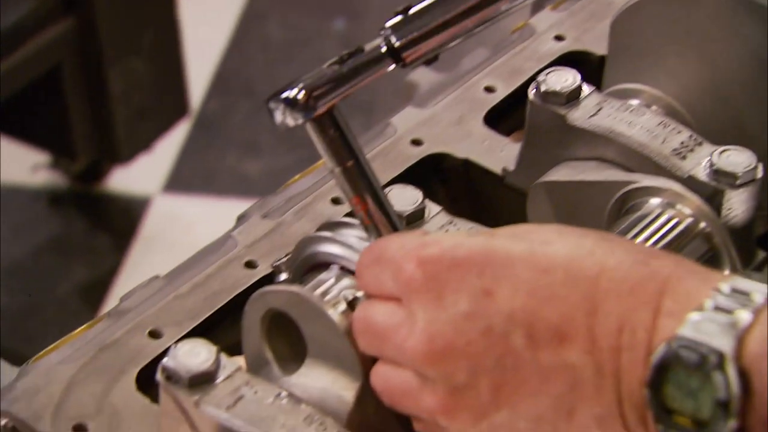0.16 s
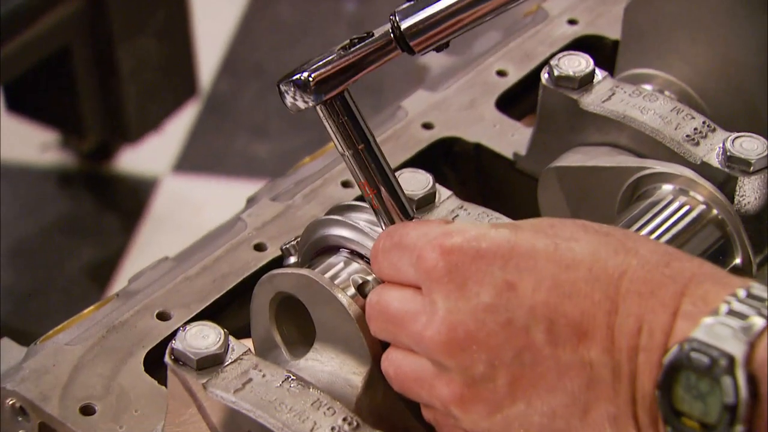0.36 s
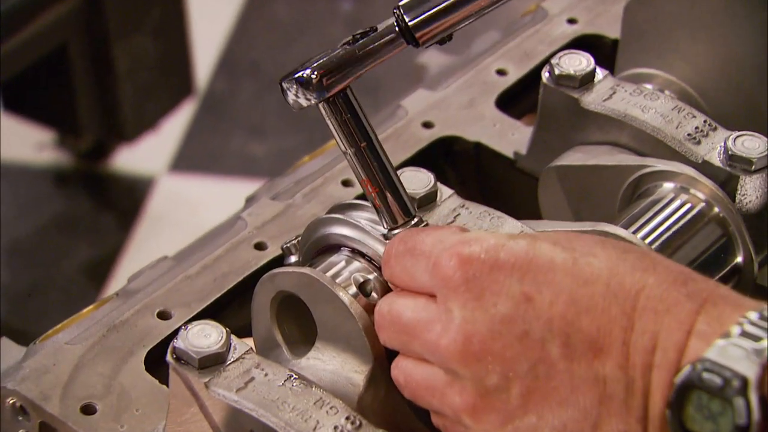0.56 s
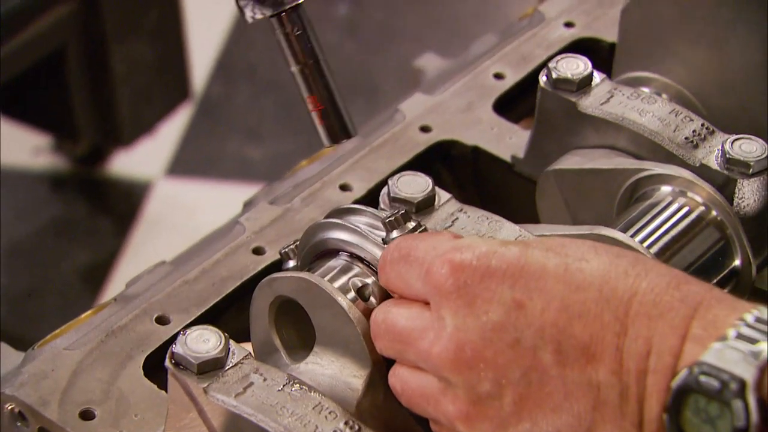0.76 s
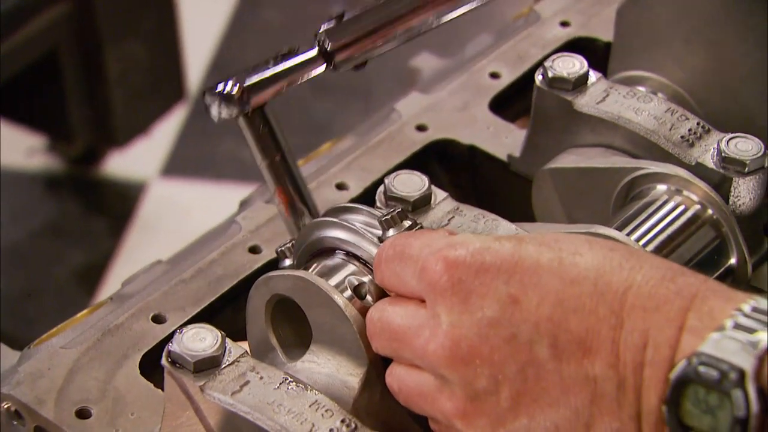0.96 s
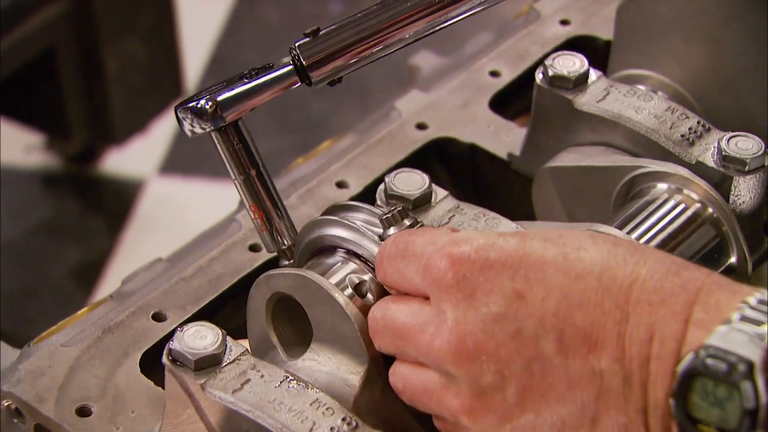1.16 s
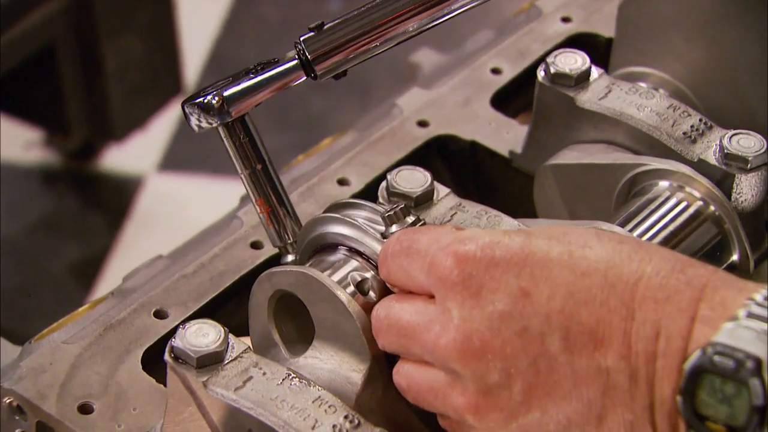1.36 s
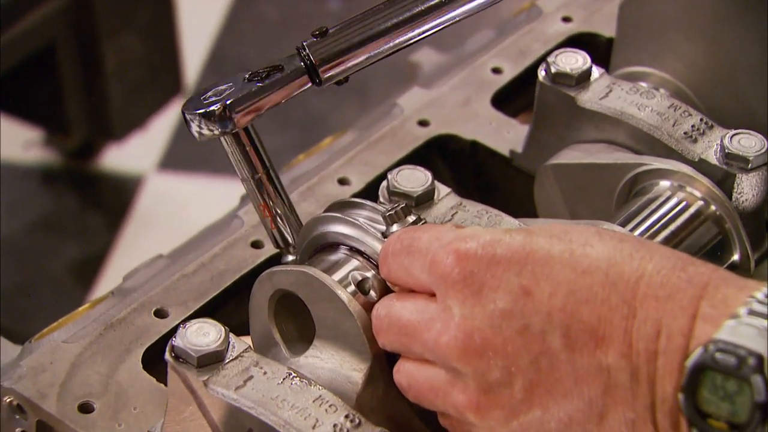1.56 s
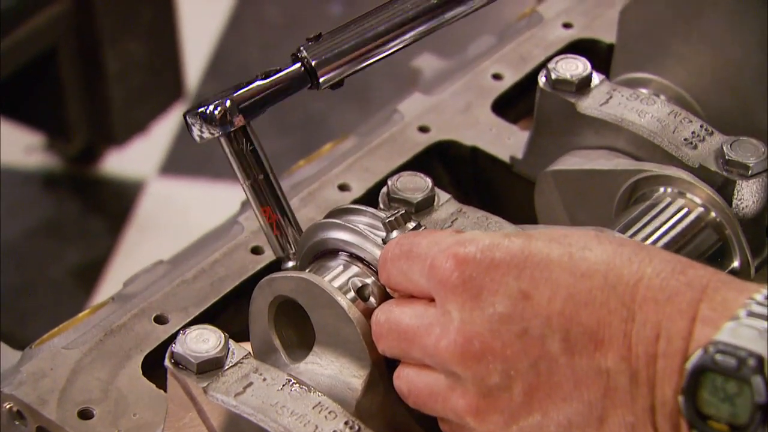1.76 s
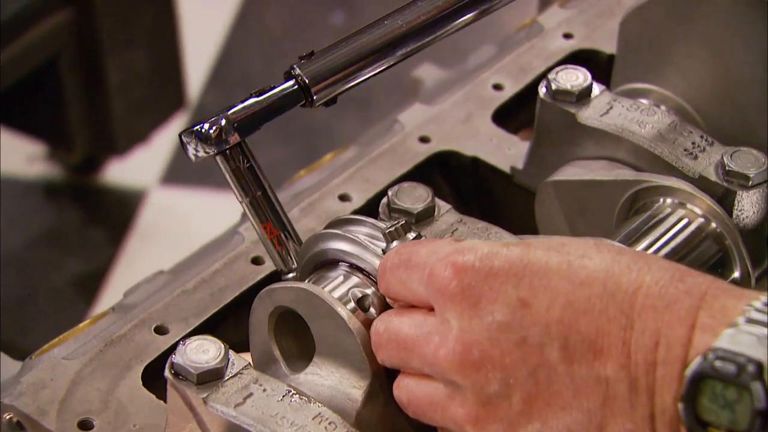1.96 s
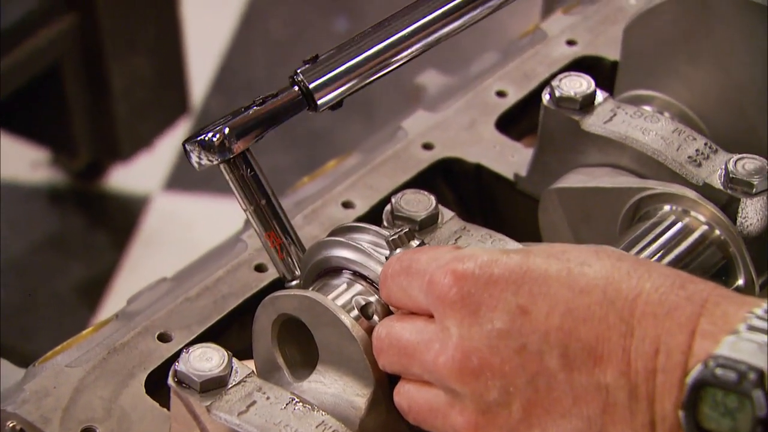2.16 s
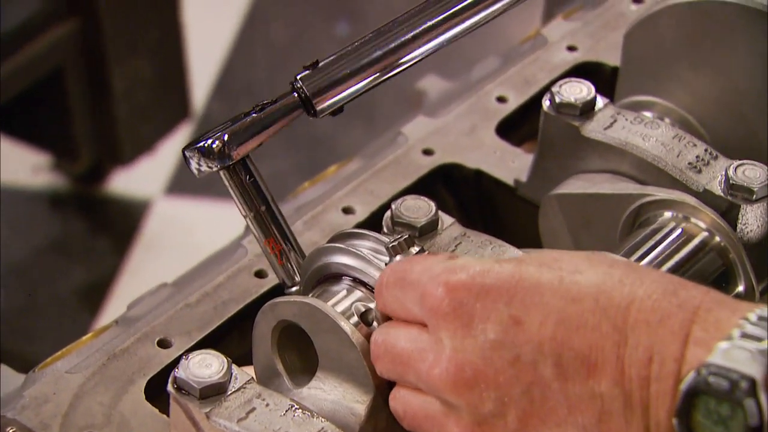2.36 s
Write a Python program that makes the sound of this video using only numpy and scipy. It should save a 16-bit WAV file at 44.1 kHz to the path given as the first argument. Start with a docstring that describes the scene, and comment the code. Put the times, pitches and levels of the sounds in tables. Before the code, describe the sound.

Click-type wrench cracks once loudly and resets more softly, followed by small metallic socket taps in a workshop

```python
"""Click-type torque wrench on an engine block

Close to the microphone, the wrench trips with a sharp click and snaps back when released: short
resonances and a noise crack, with the block ringing on. The socket then leaves its bolt with bumps,
a scrape and squeaks, and rattles and ticks on the next one: touches of noise that drive its modes.
A hard workshop answers with fading noise and a wall echo, over a low ventilation hum, a faint hiss
and a thin electrical whine."""
import sys
import numpy as np
from scipy import signal
from scipy.fft import rfft, irfft, next_fast_len
from scipy.io import wavfile
from scipy.ndimage import uniform_filter1d

SR = 44100
rng = np.random.default_rng(int(sys.argv[2]) if len(sys.argv) > 2 else 0)


def generate_wav(signal):
    """Clip the signal to [-1, 1] and save it as 16-bit WAV at the path in sys.argv[1]."""
    frames = np.transpose(np.atleast_2d(signal))
    scaled = np.clip(frames, -1, 1) * 32767
    pcm = np.round(scaled).astype(np.int16)
    wavfile.write(sys.argv[1], SR, pcm)


def volts_from_db(level):
    """Convert decibel levels to linear amplitude ratios."""
    exponent = np.asarray(level, float) / 20
    return 10 ** exponent


N = 105840  # length in samples

# Ventilation noise, the shape of its spectrum: (f/Hz, relative level per Hz/dB)
AIR_SPECTRUM = [(30, -24), (50, -20), (100, -3), (200, -6.5), (400, -12), (800, -15), (1600, -19),
                (3000, -25), (5000, -27.5), (6500, -31.5), (8000, -42), (10000, -48.5), (13000, -50),
                (16500, -55.5)]
# Wavering hum bands of the ventilation: (f/Hz, width/Hz, level/dB)
HUM_BANDS = [(79, 13, -63), (133, 12, -64)]
# How long the workshop's echo takes to die by 60 dB: (f/Hz, t60/s)
ROOM_DECAY = [(300, 0.6), (1500, 1.1), (4000, 0.98), (6000, 1.1), (9000, .6), (15000, .35)]
# How strongly the workshop answers at each pitch: (f/Hz, level/dB)
ROOM_TONE = [(300, -26.5), (700, -23.5), (1500, -9.5), (2300, -11), (3200, -3.5), (4000, -5.5), (5200, -3),
             (7000, -11.5), (10000, -17.5), (16000, -23)]
# Soft low bumps as the socket pulls off the bolt: (t/s, level/dB, f/Hz, t60/s)
PULL_BUMPS = [(0.637, -45.5, 388, 0.056), (.66, -54, 700, .03)]
# Thin gliding squeaks of the socket: (t/s, length/s, first f/Hz, last f/Hz, level/dB)
PULL_SQUEAKS = [(.641, 0.014, 12200, 12700, -62.5), (.642, 0.014, 12800, 14400, -61),
                (.652, .022, 14500, 15600, -66), (.662, .012, 12200, 11900, -70),
                (.664, 0.0093, 11300, 11300, -68), (1.52, 0.036, 11200, 11500, -90),
                (1.585, 0.076, 12900, 13500, -94), (1.6, .12, 9400, 9250, -93),
                (1.73, 0.19, 11540, 11000, -98)]
# Dull scrape of the socket: (level/dB, f/Hz, width/Hz)
PULL_SCRAPE = (-65, 930, 300)
# Socket contacts on the bolt: (t/s, level/dB, rattle t60/s, top f/Hz)
SOCKET_TAPS = [(1.0385, -32.5, 0.0047, 7000), (1.0447, -27, 0.024, 9200), (1.0531, -39.5, 0.077, 4000),
               (1.0989, -34, 0.0086, 9500), (1.107, -43, 0.057, 4000), (1.123, -45.5, 0.097, 3000),
               (1.366, -61, .08, 3500), (1.376, -49.5, 0.15, 3000), (1.3932, -44.5, 0.013, 7950),
               (1.399, -45, 0.018, 3000), (1.4066, -38.5, 0.014, 7800), (1.4132, -46.5, 0.056, 4930),
               (1.524, -52, 0.074, 7000), (1.6275, -48, 0.021, 6000), (1.787, -57.5, 0.04, 2500),
               (1.911, -55.5, 0.012, 2500)]
# Ringing modes of the socket: (f/Hz, relative level/dB, t60/s)
SOCKET_MODES = [(700, -20, 0.037), (1194, -12.5, 0.036), (1560, -11.5, 0.038), (2070, -5.5, 0.011),
                (2273, -0.5, 0.029), (2527, 0, 0.017), (2737, -20, 0.019), (3263, -7.5, 0.033),
                (3740, -2, 0.009), (4930, -3.5, 0.016), (5383, 2.5, 0.019), (6420, -4, .012),
                (6820, 2.5, 0.011)]
# Dry high ticks: (t/s, level/dB, f/Hz)
DRY_TICKS = [(1.267, -66, 7000), (1.795, -63, 9000), (2.131, -62, 7400)]
# The wrench head knocks its tube, short resonances: (f/Hz, width/Hz, relative level/dB)
TUBE_MODES = [(222, 60, -7.5), (1150, 40, -6), (1740, 180, 1.5), (2072, 250, -8), (2514, 82, -5),
              (3000, 280, -4), (4260, 150, -6.5), (5035, 100, -4.5), (5260, 430, 7.5), (7152, 250, -6),
              (8774, 250, -3), (11000, 72, -10), (12900, 130, -14.5), (14130, 300, -12),
              (15300, 400, -15.5)]
# The pawl drops back into its seat, short resonances: (f/Hz, width/Hz, relative level/dB)
PAWL_MODES = [(234, 60, -7.5), (1016, 110, -9.5), (2050, 260, -0.5), (2334, 94, -3.5), (3870, 200, 3.5),
              (4400, 640, 3.5), (4570, 200, -17.5), (5340, 200, -5), (7460, 370, -9), (10640, 170, -26),
              (11030, 610, -21.5), (12400, 510, -25), (15070, 410, -38)]
# The block's two low modes, which beat together: (f/Hz, relative level/dB, t60/s)
THUD_MODES = [(296, 0.5, .36), (250, -4, 0.27)]
# The engine block and shaft ring on: (f/Hz, relative level/dB, t60/s)
BLOCK_MODES = [(1143, -6, .12), (7154, -3, 0.15), (8597, -4, .1), (10960, -14, 0.37), (3800, -8, .3),
               (5250, -5.5, 0.64)]
# The two clicks: (level/dB, crack/dB, low thud/dB, shaft ring/dB, room/dB, room top f/Hz)
TRIP_LEVELS = (-0.5, -13.5, -46.5, -46.5, -33.5, 17999)
RESET_LEVELS = (-8.5, -21.5, -52, -59, -39.5, 8001)

TRIP_S, RESET_S = 0.2419, 0.5245  # start of the click and of the snap back
EARLY_S = 0.002  # delay of the room's answer


def unit(x):
    """Scale a sound to an average (rms) strength of 1."""
    return x / np.sqrt(np.mean(x ** 2) + 1e-20)


def along(points, hz):
    """Read a value between (Hz, value) points, on a log pitch axis."""
    f, v = np.transpose(points)
    return np.interp(np.log(hz + 1), np.log(f + 1), v)


def filtered(x, response):
    """Multiply the spectrum of a sound by a response that depends on frequency."""
    m = next_fast_len(len(x) + 8192)
    return irfft(rfft(x, m) * response(np.fft.rfftfreq(m, 1 / SR)), m)[:len(x)]


def band(x, centre_hz, width_hz):
    """Keep a bell-shaped band of frequencies."""
    return filtered(x, lambda f: np.exp(-((f - centre_hz) / width_hz) ** 2))


def low(x, top_hz):
    """Soften the treble with a two-pole low-pass."""
    return signal.lfilter(*signal.butter(2, top_hz, fs=SR), x)


def add(track, s, sound):
    """Mix a sound into a track, starting at s seconds."""
    part = track[round(s * SR):][:len(sound)]
    part += sound[:len(part)]


def ring(modes, scatter_db, attack=0.00027, rough_db=0):
    """Struck metal: damped sines from (Hz, dB, t60) rows, each at a random level and perhaps wavering."""
    hz, db, t60 = np.transpose(modes)[:, :, None]
    t = np.arange(SR // 2) / SR
    chance = rng.standard_normal((len(hz), 41))
    # a new random level every 10 ms, joined by straight lines
    waver = np.array([np.interp(t, np.arange(40) / 100, row) for row in chance[:, 1:]])
    level_db = db + scatter_db * chance[:, :1] + rough_db * waver - 60 * t / t60
    lines = volts_from_db(level_db) * np.sin(2 * np.pi * hz * t)
    return lines.sum(0) * (1 - np.exp(-(t / attack) ** 2))


def crack(t60, attack=0.00026):
    """A hard touch: a short burst of noise with little bass."""
    t = np.arange(SR // 2) / SR
    bright = np.diff(rng.standard_normal(len(t) + 1))
    return bright * volts_from_db(-60 * t / t60) * (1 - np.exp(-t / attack))


def workshop():
    """Ventilation: shaped noise with two wavering hum bands (narrow noise), plus a steady sine whine."""
    air = volts_from_db(-63.5) * unit(filtered(rng.standard_normal(N), lambda hz: volts_from_db(along(AIR_SPECTRUM, hz))))
    hum = np.zeros(N)
    for hz, width, db in HUM_BANDS:
        hum += volts_from_db(db) * unit(band(rng.standard_normal(N), hz, width))
    whine = volts_from_db(-91.5) * np.sin(2 * np.pi * 15734 * np.arange(N) / SR)
    return air + hum + whine


def room():
    """The wash after a blow: dense early returns from the bench, then a tail that dies band by band."""
    hz, t, spectrum = signal.stft(rng.standard_normal(SR * 3 // 2), SR, nperseg=128)
    tail = volts_from_db(-60 * t / along(ROOM_DECAY, hz)[:, None])
    early = volts_from_db(16 - 60 * t / 0.057)  # 16 dB above the tail at first, t60 0.057 s
    tone = volts_from_db(along(ROOM_TONE, hz))[:, None]
    return signal.istft(spectrum * (tail + early) * tone, SR, nperseg=128)[1]


def pull_off():
    """Socket leaving one bolt and turning on the next: ringing bumps, gliding sines, a band of rubbing noise."""
    out = np.zeros(N)
    for s, db, hz, t60 in PULL_BUMPS:
        modes = [(hz, db, t60), (1.6 * hz, db - 6.5, t60)]
        add(out, s, ring(modes, scatter_db=2.5, attack=0.0016))
    for s, length, from_hz, to_hz, db in PULL_SQUEAKS:
        n = round(length * SR)
        jitter = 500 * uniform_filter1d(rng.standard_normal(SR // 4), 30)[:n]
        hz = np.linspace(from_hz, to_hz, n) + jitter
        squeak = np.sin(2 * np.pi * np.cumsum(hz) / SR)
        add(out, s, volts_from_db(db) * np.sqrt(np.hanning(n)) * squeak)
    db, hz, width = PULL_SCRAPE
    rub = unit(band(rng.standard_normal(SR // 4), hz, width))
    n = round(0.13 * SR)  # the scrape lasts 0.13 s
    add(out, 0.632, volts_from_db(db) * rub[:n] * np.sqrt(np.hanning(n)))
    return out


def socket():
    """Light steel contacts: a sharp touch and brief rattle drive the socket's modes; a few dry ticks."""
    out = np.zeros(N)
    for s, db, t60, top_hz in SOCKET_TAPS:
        touch = 1.74 * crack(0.0028, attack=1e-5)
        rattle = crack(t60, attack=1e-5) + touch
        modes = ring(SOCKET_MODES, scatter_db=4)
        driven = signal.fftconvolve(modes, low(rattle, top_hz=2500))[:SR // 2]
        tap = low(driven, top_hz)
        bare = volts_from_db(-16) * low(low(rattle, top_hz), top_hz)  # the touch and rattle heard directly
        add(out, s, volts_from_db(db) * (tap / np.abs(tap).max() + bare))
        add(out, s + EARLY_S, volts_from_db(db - 25.5) * low(room(), top_hz=6000))
    for s, db, hz in DRY_TICKS:
        add(out, s, volts_from_db(db) * band(crack(0.016), hz, 1200))
    return out


def click(s, levels, part):
    """One blow inside the wrench: short resonances, a crack, the block ringing on, the room's wash."""
    db, crack_db, thud_db, block_db, room_db, top_hz = levels
    attack_s = 0.00092
    # a wider resonance dies sooner; its level is raised to match
    modes = [(hz, level + 20 * np.log10(width / 100), np.log(1000) / np.pi / width)
             for hz, width, level in part]
    blow = ring(modes, scatter_db=1, attack=attack_s)
    # the first instant is stronger: an extra 10 dB copy with a t60 of 0.005 s
    blow = blow * (1 + volts_from_db(10 - 60 * np.arange(len(blow)) / SR / 0.005))
    blow = blow / np.abs(blow).max()
    blow = blow + volts_from_db(crack_db) * low(crack(0.027, attack_s), top_hz=7000)
    block = [(hz, level + thud_db, t60) for hz, level, t60 in THUD_MODES]
    block += [(hz, level + block_db, t60) for hz, level, t60 in BLOCK_MODES]
    ringing = ring(block, scatter_db=6, attack=0.0046, rough_db=3)
    out, wash = np.zeros(N), np.zeros(N)
    add(out, s, volts_from_db(db) * blow + ringing)
    add(wash, s + EARLY_S, volts_from_db(room_db) * low(room(), top_hz))
    return out, wash


def scene():
    """Wrench clicks, a rebound of the snap back, a bright wall echo, the socket and the workshop."""
    trip, trip_wash = click(TRIP_S, TRIP_LEVELS, TUBE_MODES)
    reset, reset_wash = click(RESET_S, RESET_LEVELS, PAWL_MODES)
    rebound = volts_from_db(-15) * np.roll(low(reset, top_hz=5500), round(0.0100 * SR))  # 10 ms later
    clicks = trip + reset + rebound
    treble = filtered(clicks, lambda hz: hz ** 4 / (hz ** 4 + 4500 ** 4))  # mostly above 4500 Hz
    wall = volts_from_db(-24) * np.roll(treble, round(0.0238 * SR))  # 23.8 ms later
    mix = clicks + wall + trip_wash + reset_wash + socket() + pull_off() + workshop()
    return mix[None]


def low_pass(x):
    """Removes everything above the highest recorded frequency."""
    return signal.sosfilt(signal.butter(12, 16830, fs=SR, output="sos"), x)


def record(dry):
    """The microphone loses the deep bass and the very top of the treble."""
    without_bass = signal.lfilter(*signal.butter(2, 67.6, "high", fs=SR), dry)
    heard = low(without_bass, top_hz=16000)
    return low_pass(heard)


dry = scene()
out = record(dry)
generate_wav(out)
```